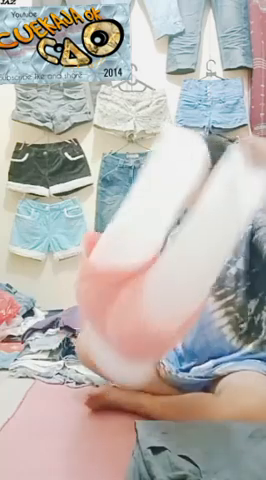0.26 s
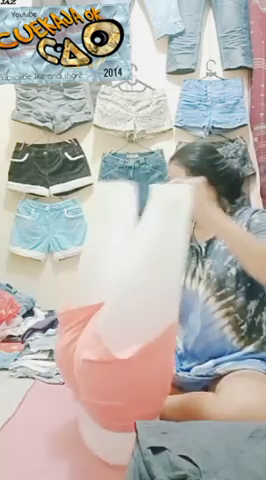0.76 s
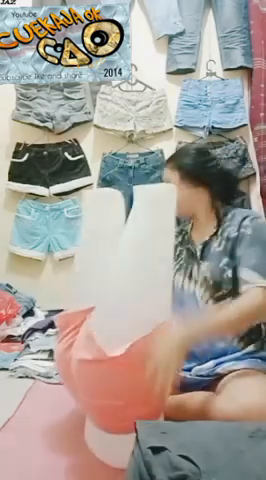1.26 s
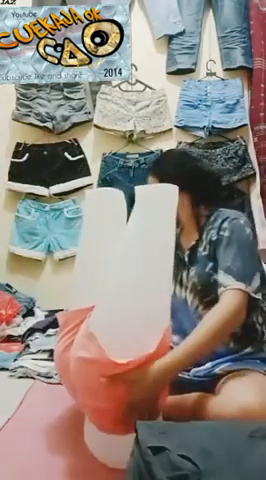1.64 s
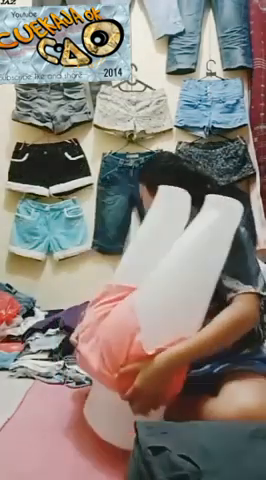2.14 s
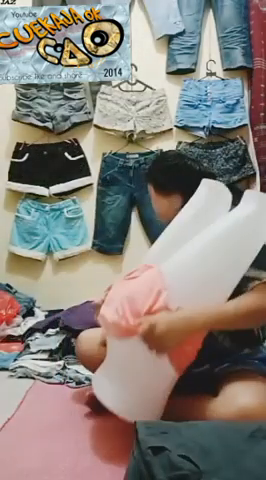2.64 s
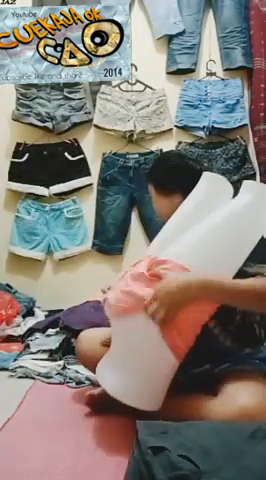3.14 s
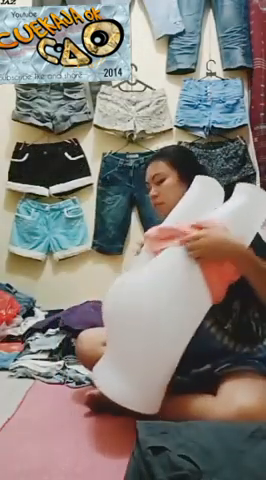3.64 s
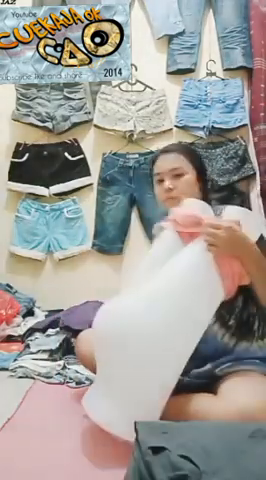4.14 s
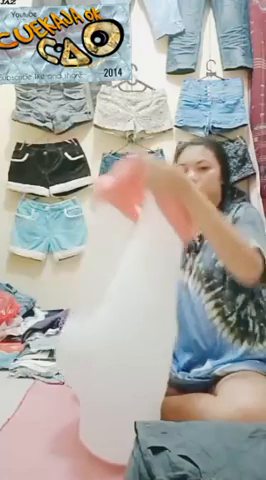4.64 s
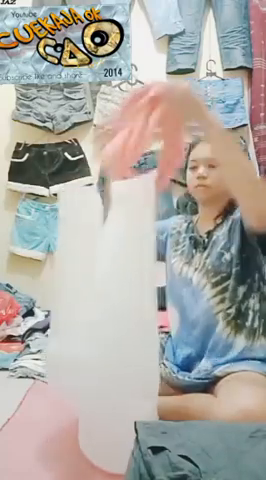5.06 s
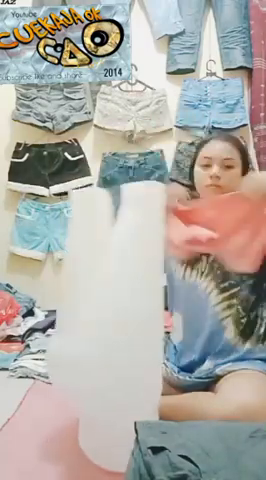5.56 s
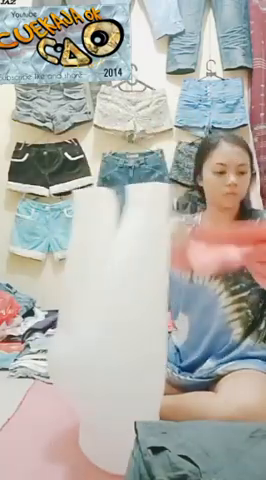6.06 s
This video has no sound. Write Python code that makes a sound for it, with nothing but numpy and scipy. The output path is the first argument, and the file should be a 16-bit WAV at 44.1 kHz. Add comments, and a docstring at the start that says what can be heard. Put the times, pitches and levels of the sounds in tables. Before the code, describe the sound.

A hollow plastic mannequin bumps softly amid a rustle of cloth, then lands on a mat at about 0.7 seconds with a strong, dull thud and a short low ring. Lighter knocks follow near 1.3 and 2 seconds. From about 2.2 to 3.6 seconds shorts are dragged off the shell in uneven rustling tugs, with small snaps, brief unsteady honks where the cloth catches, and another bump near 2.9. At about 3.8 seconds comes the loudest moment, a quick cluster of hollow, booming thumps. More pulls follow, with two clearer short honks near 4.1 and 4.4 seconds. The rustling fades by about 5 seconds, leaving a few soft knocks, the clearest near 5.5, until the end just after 6 seconds. The cloth echoes briefly in a small room with a faint steady hiss, heard through a phone microphone that loses the highest treble.

```python
"""A hollow plastic mannequin is set down, bumped and turned on a mat as shorts are dragged off it.
Each bump gives a dull thud and makes the shell ring. The sliding cloth rustles, snaps and
shakes the same shell, which sometimes honks. The cloth echoes briefly in a small, softly
hissing room, and a phone microphone loses the highest treble."""
import sys
import numpy as np
from scipy import signal
from scipy.fft import rfft, irfft, next_fast_len
from scipy.io import wavfile
from scipy.ndimage import uniform_filter1d

SR = 44100
rng = np.random.default_rng(int(sys.argv[2]) if len(sys.argv) > 2 else 0)


def file_out(sig):
    """Save sig as 16-bit WAV at sys.argv[1]."""
    # one column per channel
    cols = np.atleast_2d(sig).T
    # limit, then scale
    lim = np.clip(cols, -1, 1)
    pcm = np.round(lim * 32767).astype(np.int16)
    wavfile.write(sys.argv[1], SR, pcm)


N = 277609

# notes (modes) of the plastic wall: f/Hz, level/dB, ring time/s (t60, the time to fade by 60 dB)
WALL_MODES = [(231.5, 10, 0.23), (284.7, 11, 0.11), (403, 3, 0.11), (440, 5, .12), (472, -1, 0.13),
              (617.7, 4, 0.045), (668, -6, 0.17), (740, -10, 0.1), (940, -13, .1), (1040, -7, .12),
              (1180, -11, 0.11)]
# how the microphone colours bumps, shell and snaps: f/Hz, gain/dB
MIC_RESPONSE = [(25, -42), (60, -1), (2800, 8.5), (4200, -12), (6000, -27.5), (15000, -40)]


def amp(db):
    """Turns decibels into a factor to multiply by."""
    return 10 ** (np.asarray(db) / 20)


def unit_rms(x):
    """Scales a signal so that its average strength (rms) is 1."""
    return x / np.sqrt(np.mean(x ** 2) + 1e-20)


def coloured(x, points):
    """Turns pitches up or down along a curve of (f/Hz, gain/dB) points."""
    hz, db = np.transpose(points)
    size = next_fast_len(len(x))
    f = np.fft.rfftfreq(size, 1 / SR)
    gain = amp(np.interp(np.log(f + 1), np.log(hz), db))
    return irfft(rfft(x, size) * gain, size)[:len(x)]


def resonate(x, hz, t60):
    """Lets a signal ring at one pitch; the result has rms 1."""
    r = amp(-60 / (t60 * SR))
    return unit_rms(signal.lfilter([1, 0, -1], [1, -2 * r * np.cos(2 * np.pi * hz / SR), r ** 2], x))


def wander(seconds):
    """A smooth random curve of rms 1 that changes over about the given time."""
    span = max(round(seconds * SR), 1)
    return unit_rms(uniform_filter1d(uniform_filter1d(rng.standard_normal(N), span), span))


def room_noise():
    """The steady hush of the room and the microphone."""
    # tone of the hush: f/Hz, level/dB
    spectrum = [(25, -15.5), (45, -39), (70, 1.5), (135, 4), (240, -3), (520, -9), (660, -10), (1200, -18),
                (2200, -16.5), (3000, -20.5), (4200, -30.5), (6000, -37.5), (10500, -37.5), (12500, -39),
                (15500, -55)]
    return amp(-64) * unit_rms(coloured(rng.standard_normal(N), spectrum))


def room_echo(x):
    """Nearby walls send back many small reflections that fade quickly."""
    t = np.arange(SR // 2) / SR
    reflections = rng.choice([-1., 1.], len(t)) * (rng.random(len(t)) < .05)
    tail = reflections * amp(-60 * t / 0.12) * (t > .006)
    return signal.fftconvolve(x, tail / np.linalg.norm(tail))[:N]


def snaps(t60=.035):
    """Cloth snaps and first touches give sudden, bright bursts of noise."""
    # bursts: t/s, level/dB
    bursts = [(0.679, -48), (0.808, -54), (1.9654, -52), (2.2416, -54), (2.5646, -47), (3.0076, -46.5),
              (3.7932, -42), (3.897, -52), (4.074, -47), (4.38, -45), (4.777, -48), (5.548, -62),
              (6.015, -62)]
    out, t = np.zeros(N), np.arange(SR // 8) / SR
    for start, db in bursts:
        out[round(start * SR):][:len(t)] += amp(db - 60 * t / t60) * rng.standard_normal(len(t))
    bright = out - uniform_filter1d(out, size=60)
    return coloured(bright, MIC_RESPONSE)


def honks(judder_db=1.8):
    """The dragged cloth catches and slips, keeping one note of the wall sounding unsteadily."""
    # honks: t/s, length/s, level/dB, f/Hz
    catches = [(0.035, .04, -55, 660), (0.19, .06, -58, 670), (0.855, .06, -56, 435),
               (0.89, 0.05, -52, 666), (2.231, .06, -43.5, 689), (2.305, 0.1, -48, 614),
               (2.791, .06, -49.5, 628), (3.014, .08, -56, 620), (3.14, .05, -50, 640),
               (3.35, 0.14, -46, 565), (4.083, 0.071, -39.5, 729), (4.403, 0.065, -38.5, 676),
               (4.606, 0.038, -51, 677), (4.797, .11, -49.5, 671), (5.21, .13, -62, 440),
               (5.78, .06, -62, 440)]
    out = np.zeros(N)
    for start, length, db, hz in catches:
        noise = rng.standard_normal(SR // 2)
        n = round(length * SR)
        tone = resonate(resonate(noise, hz, 0.05), hz, 0.03)[-n:]
        tone = tone / np.sqrt(abs(signal.hilbert(tone)) + .1)  # partly evens out the loudness
        judder = unit_rms(signal.fftconvolve(noise, np.hanning(400), "same"))[:n]
        tone = unit_rms(tone * amp(judder_db * judder))
        out[round(start * SR):][:n] += amp(db) * tone * signal.windows.tukey(n, .5)
    return out


def stroke_gains(sag_db_per_s=15, release_db_per_s=300, rest_db=-78):
    """Each pull builds, tires and lets go. Gives gains for rustle, its low half, wall and rasp."""
    # pulls: peak t/s, time to climb 20 dB/s, hold/s, rustle/dB,
    # then relative to the rustle: low half/dB, wall/dB, rasp/dB
    pulls = [(0.03, .1, .42, -53, -5, -15, -22), (0.18, .1, .06, -57, -4, -4, -24),
             (0.685, .22, .02, -56.5, -8, -14, -23), (0.76, .05, .08, -62, 0, 0, -22),
             (0.86, .25, .08, -55, 1, -2, -29), (1.085, .015, .04, -69, 0, -4, -28),
             (1.312, .02, .14, -63, 0, -8, -23), (1.55, .15, .05, -63.5, -1, -10, -24),
             (1.78, .2, .28, -53.5, -1, -8, -25), (1.967, .05, .01, -52.5, -1, -11, -29),
             (2.19, .06, .06, -48, 0, -17, -36), (2.285, .13, .035, -38, -2, -13, -29),
             (2.36, .1, .37, -50.5, 1, -8, -27), (2.78, .1, .045, -43.5, 0, -8, -34),
             (2.92, .12, .035, -58, 1, -6, -31), (3.013, .015, .02, -50, 2, -4, -36),
             (3.045, .05, .21, -39, 0.5, -19, -33), (3.17, .1, .06, -43, -2, -16, -25),
             (3.29, .1, .1, -51, 0, -7, -19), (3.41, .14, .05, -42, 0, -8, -27),
             (3.5, .1, .22, -53, 0, -11, -18.5), (3.765, .2, .04, -46, 0, -11, -26),
             (3.85, .05, .14, -60, -1, -6, -19), (4.09, .09, .025, -41.5, 0, -6, -32),
             (4.35, .15, .02, -62, -4, -15, -19), (4.4, .05, .05, -44, 0, -12, -29),
             (4.49, .1, .24, -54, 1, 0, -22), (4.73, .05, .06, -51, 1, -1, -26),
             (4.75, .004, .025, -56, -6, -10, -12), (4.82, .1, .1, -61, 2, 4, -25),
             (5.24, .1, .1, -72, -1, 2, -26)]
    t = np.arange(0, N + 64, 64) / SR
    power = amp(2 * rest_db) * np.outer([1, 1, 1, 0], np.ones(len(t)))  # cloth never lies quite still
    for peak, climb, hold, db, *relative_db in pulls:
        before, after = np.maximum(peak - t, 0), np.maximum(t - peak, 0)
        fade_db = sag_db_per_s * after + release_db_per_s * np.maximum(after - hold, 0)
        level_db = db - 20 * before / climb - fade_db
        power += amp(2 * np.add.outer([0, *relative_db], level_db))
    return np.sqrt([np.interp(np.arange(N) / SR, t, row) for row in power])


def folds(x, depth_db=2.2):
    """Folds of cloth favour now one pitch range, now another, in patches of about 350 Hz by 60 ms."""
    bands = signal.stft(x, nperseg=512, noverlap=384)[2]
    patches = rng.standard_normal(bands.shape[::-1]).T
    patches = unit_rms(uniform_filter1d(uniform_filter1d(patches, size=4, axis=0), size=20, axis=1))
    return signal.istft(bands * amp(depth_db * patches), nperseg=512, noverlap=384)[1][:len(x)]


def cloth(body_hz=150, body_t60=0.071, gentle_db=-55):
    """Fibres slip in many tiny jerks that rustle, rasp and shake the hand-held shell."""
    # tone of cloth on plastic: f/Hz, level/dB
    rustle_spectrum = [(100, -33.5), (220, -4), (450, -5.5), (900, -3), (1320, -10), (1760, -3),
                       (2200, -4.5), (2800, -8.5), (3600, -30), (4600, -63)]
    # filter that keeps the low half of the rustle: f/Hz, gain/dB
    low_half = [(1100, 0), (1700, -30)]
    # dry, scratchy edge of the fibres: f/Hz, level/dB
    rasp_spectrum = [(1500, -31.5), (2600, 1.5), (3600, 0), (4400, -1), (5300, -7), (5900, -16.5),
                     (8000, -21), (10500, -15), (12500, -23), (15500, -38)]
    rustle_gain, low_gain, wall_gain, rasp_gain = stroke_gains()
    grains = rng.standard_normal(N) * amp(1.5 * wander(0.0016) + 1.3 * wander(0.032))
    snags = rng.standard_normal(N) * amp(2.2 * wander(0.025))
    # dragging rings the wall's notes more evenly and briefly than a bump
    wall = sum(amp(.1 * db) * resonate(grains, hz, 0.44 * t60) for hz, db, t60 in WALL_MODES)
    # a harder pull raises the low hum of the body less than the rustle
    excess_db = np.maximum(20 * np.log10(rustle_gain) - gentle_db, 0)
    body_gain = amp(-4 - .55 * excess_db) * rustle_gain
    body = resonate(resonate(snags, body_hz, body_t60), body_hz, body_t60)
    shell = coloured(wall_gain * unit_rms(wall) + body_gain * body, MIC_RESPONSE)
    rustle = unit_rms(coloured(folds(grains), rustle_spectrum))
    low = coloured(rustle, low_half)
    rasp = unit_rms(coloured(grains, rasp_spectrum))
    return rustle_gain * (rustle - low) + low_gain * low + rasp_gain * rasp + shell


def bump(thud_db, thud_hz, boom_db, hard_db, ring_db, contact_s, ring_factor):
    """One blow thuds; the shell's low notes swell during the contact and its wall clacks sooner."""
    # low notes of the shell, the first from the air inside: f/Hz, level/dB, ring time/s
    low_modes = [(74.6, -7.5, 0.68), (135.6, -1, 0.51), (168.1, -6.5, .25)]
    spots = rng.standard_normal(len(WALL_MODES))
    t = np.arange(30000) / SR
    progress = t / contact_s
    thud = (progress / 2) ** 2 * np.exp(2 - progress) * np.sin(2 * np.pi * thud_hz * t)
    ring = 0
    for (hz, db, t60), drive_db in zip(low_modes, (boom_db, ring_db, ring_db)):
        ring += amp(drive_db + db - 60 * t / (t60 * ring_factor)) * np.sin(2 * np.pi * hz * t)
    clack = amp(1 - 60 * t / 0.041) * rng.standard_normal(len(t))  # the surface scuffs at first touch
    # each blow lands on another spot, shifting the strength and tuning of the wall's notes
    for (hz, db, t60), spot in zip(WALL_MODES, spots):
        fade = amp(db + 3 * spot - 60 * t / (t60 * ring_factor))
        clack += fade * np.sin(2 * np.pi * (hz * (1 + .012 * spot) * t + spot))
    ring_rise = 1 - np.exp(-(progress / 2) ** 2)
    clack_rise = 1 - np.exp(-(progress / 1.14) ** 2)
    return amp(thud_db) * (thud + ring_rise * ring + amp(hard_db) * clack_rise * clack)


def mannequin_bumps():
    """The hollow shell is knocked again and again as it is handled on the mat."""
    # blows: t/s, thud/dB, thud f/Hz, then relative to the thud: air boom/dB, hard clack/dB, low ring/dB,
    # then contact time/s, ring time factor (small when the shell is held)
    blows = [(0.035, -32, 126, 1, -25.5, -8.5, 0.0047, 0.93), (0.09, -48.5, 111, -11, -32, -5, 0.004, 0.64),
             (0.442, -52, 135, -8, -25, -6, 0.007, 0.6), (0.464, -40.5, 139, 6, -25, 1, 0.0074, 0.9),
             (0.561, -48.5, 135, -24, -14, -15, 0.0036, 0.55),
             (0.6775, -16.5, 145.2, -12, -23, -3, 0.0058, 1), (0.955, -50, 135, 2, -25, -2, 0.008, 0.7),
             (1.086, -59, 257, -16, 0, -28, 0.006, 1), (1.105, -47.5, 136, 3.5, -23, 1, 0.0054, 0.98),
             (1.208, -49, 128, -13, -29, -25, 0.01, 0.74), (1.307, -31, 151, -9.5, -25, -10, 0.0053, 0.65),
             (1.359, -45.5, 122.3, -6, -13.5, -10, 0.011, 0.93),
             (1.799, -42.5, 157, -8, -14.5, -6, 0.0069, 1),
             (1.963, -29.5, 150, -8.5, -14, -3.5, 0.006, 0.98),
             (2.038, -37, 134.4, -30, -28, -24, 0.005, 0.53), (2.239, -47, 230, -52, -29, -7, 0.0042, 0.96),
             (2.791, -44, 223, -29, -8, 0, 0.0076, 0.68), (2.911, -28, 158, -12.5, -19, -6.5, 0.0067, 0.72),
             (3.792, -17, 132.4, -0.5, -19, -5.5, 0.0029, 1),
             (3.806, -13, 155.2, -2.5, -46, 1, 0.0068, 0.25), (3.833, -20, 150, -30, -30, -12, 0.0025, 0.5),
             (3.9045, -18.5, 162, -11, -23, -9.5, 0.0052, 0.73),
             (3.935, -29.5, 159.4, -5, -22.5, -10, 0.0072, 0.82), (4.02, -45, 150, -8, -14, -3, 0.008, 0.8),
             (4.462, -44.5, 137, -12, -14, -4.5, 0.006, 0.62), (4.574, -39, 157, -35, -13, 1, 0.011, 0.96),
             (4.699, -42.5, 155.6, -23, -10, 4, 0.0076, 0.89), (4.804, -41, 134, 2, -20, 0, 0.0067, 0.96),
             (5.203, -47, 149, 5, -13, 3.5, 0.011, 1), (5.466, -53, 140, -10, -14, -8, 0.008, 0.7),
             (5.491, -39, 141, 3.5, -20.5, -4, 0.0064, 1), (5.779, -52, 129, -8, -20, 0.5, 0.0052, 1),
             (5.812, -52, 135, -4, -16, -6, 0.006, 0.7), (6.003, -50.5, 135, -4, -14, -2, 0.011, 1)]
    out = np.zeros(N + SR)
    for start, *settings in blows:
        sound = bump(*settings)
        out[round(start * SR):][:len(sound)] += sound
    return coloured(out, MIC_RESPONSE)[:N]


def scene():
    """Mixes the bumps, the cloth sounds with their echo, and the hush into one channel."""
    rubbing = cloth() + honks() + snaps()
    return (mannequin_bumps() + rubbing + amp(-10.5) * room_echo(rubbing) + room_noise())[None]


def record(dry):
    """The microphone loses the treble above 15700 Hz."""
    low_pass = signal.firwin(511, 15700, window=("kaiser", 9), fs=SR)
    return signal.oaconvolve(dry, low_pass[None], "same")


dry = scene()
out = record(dry)
file_out(out)
```